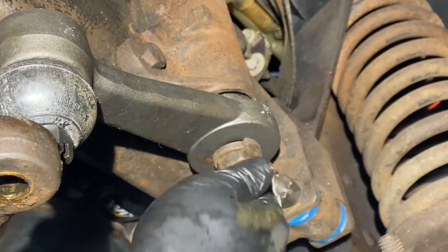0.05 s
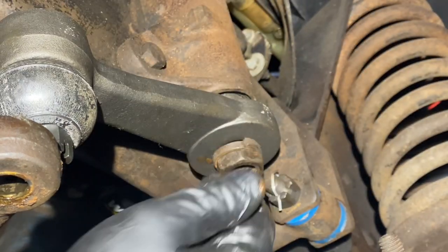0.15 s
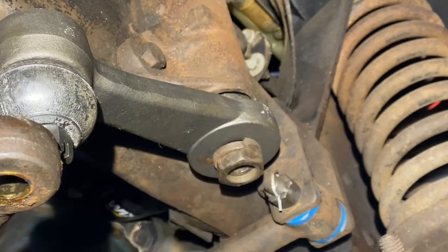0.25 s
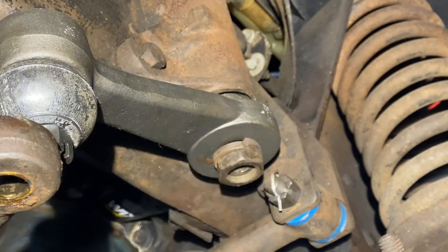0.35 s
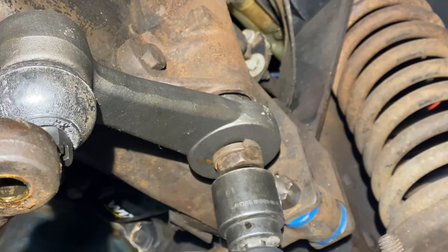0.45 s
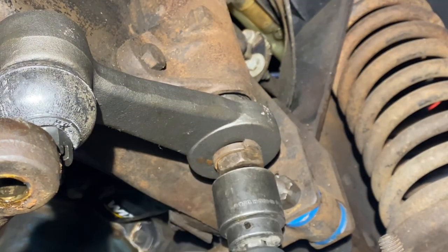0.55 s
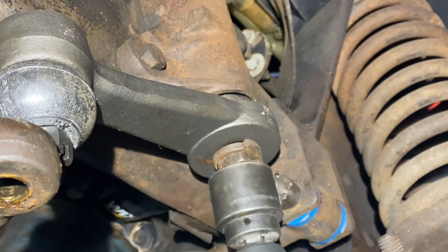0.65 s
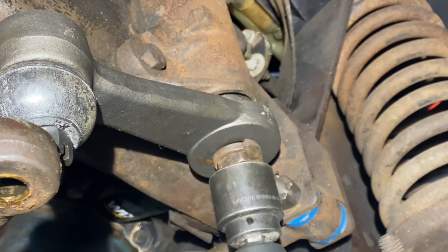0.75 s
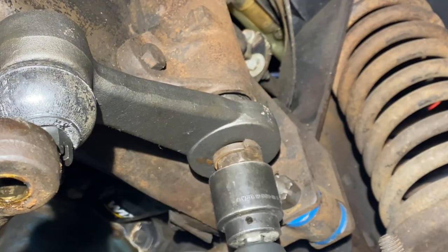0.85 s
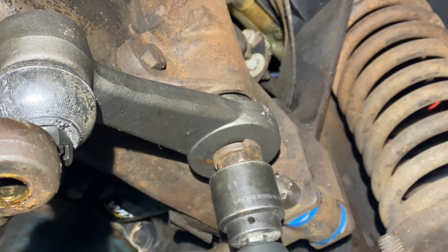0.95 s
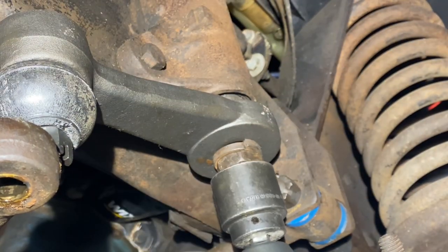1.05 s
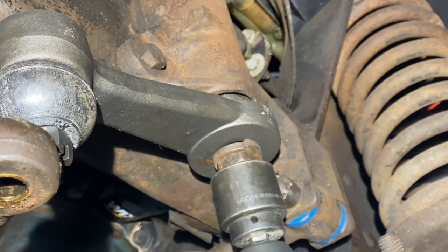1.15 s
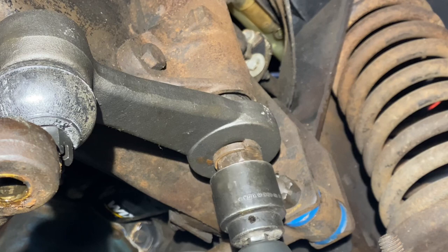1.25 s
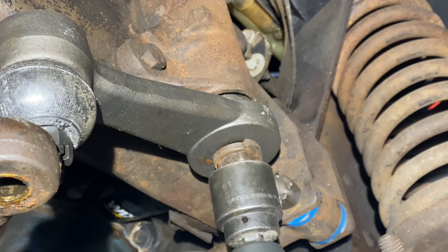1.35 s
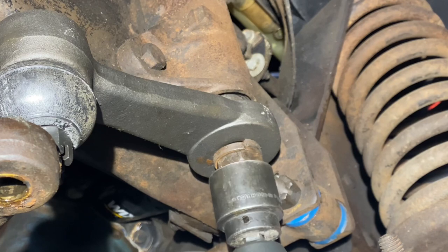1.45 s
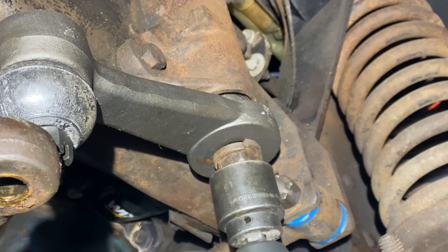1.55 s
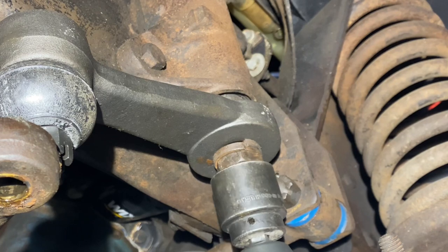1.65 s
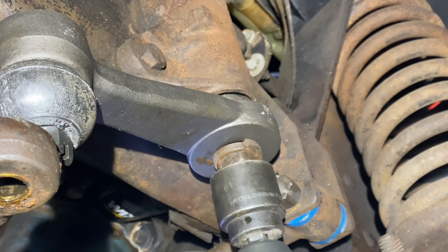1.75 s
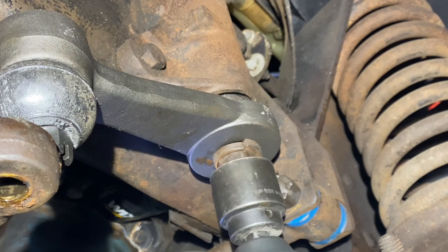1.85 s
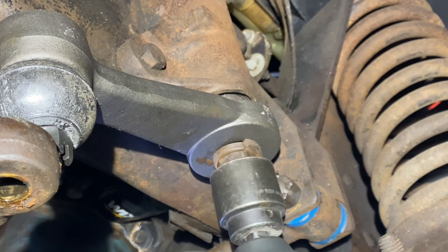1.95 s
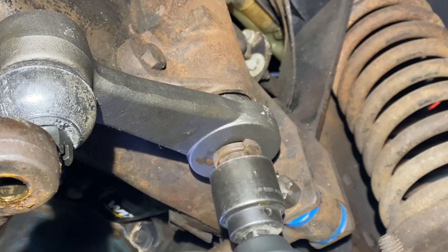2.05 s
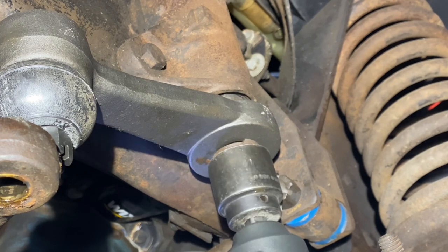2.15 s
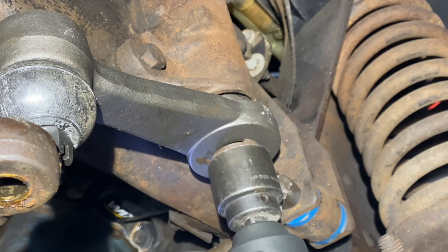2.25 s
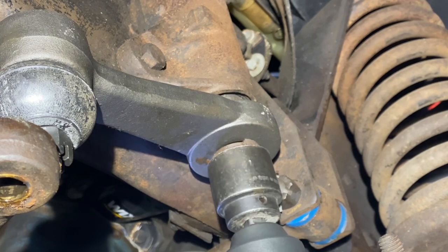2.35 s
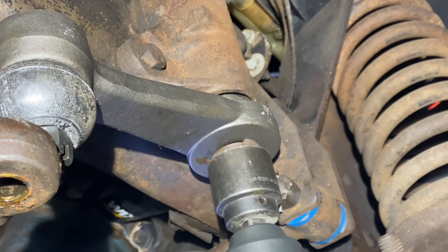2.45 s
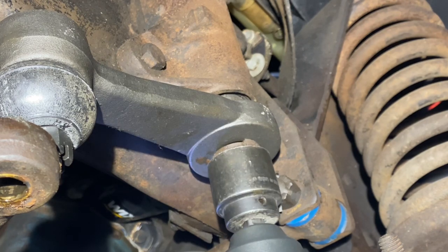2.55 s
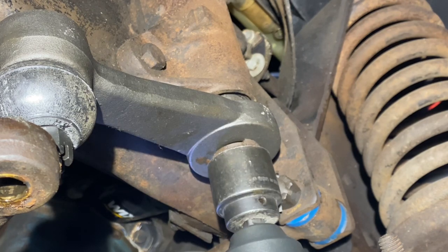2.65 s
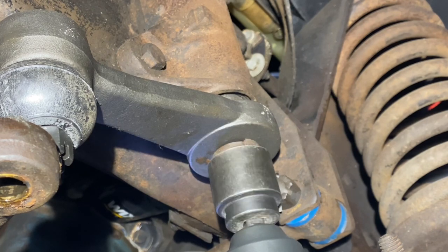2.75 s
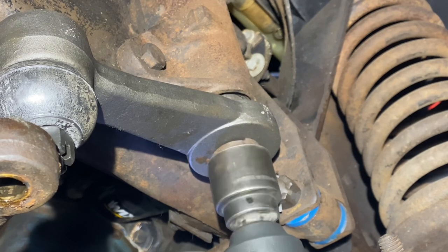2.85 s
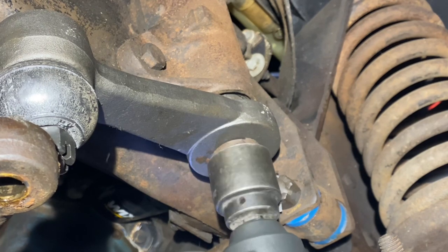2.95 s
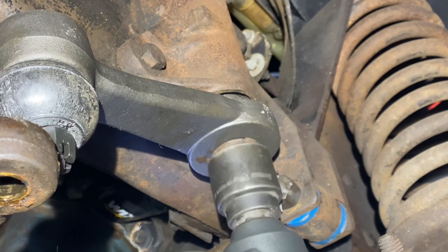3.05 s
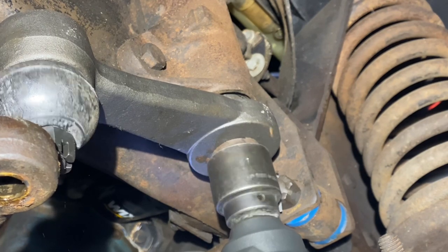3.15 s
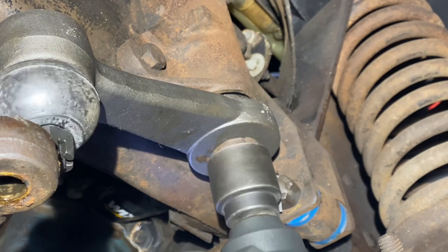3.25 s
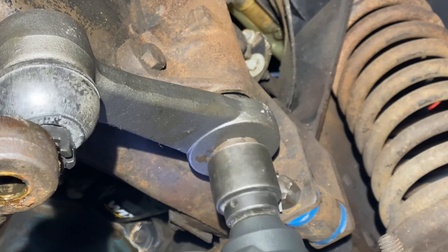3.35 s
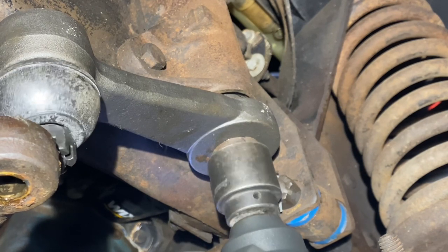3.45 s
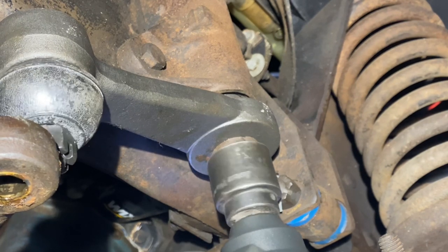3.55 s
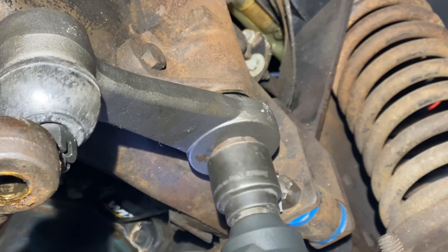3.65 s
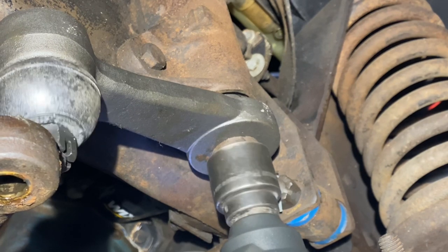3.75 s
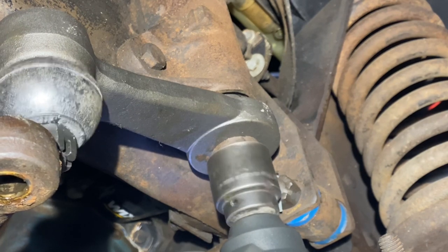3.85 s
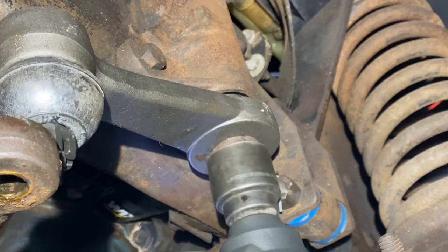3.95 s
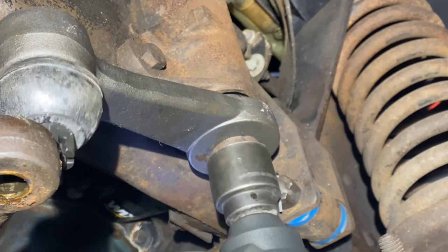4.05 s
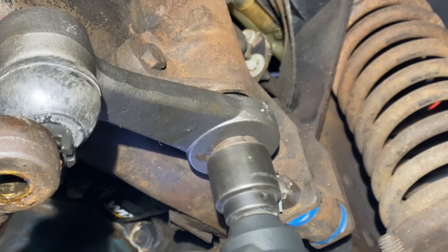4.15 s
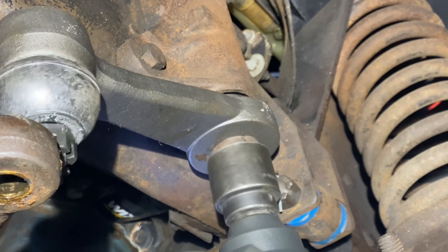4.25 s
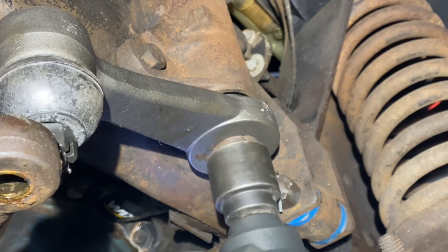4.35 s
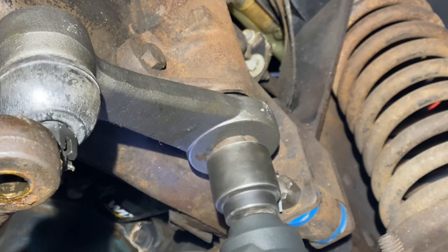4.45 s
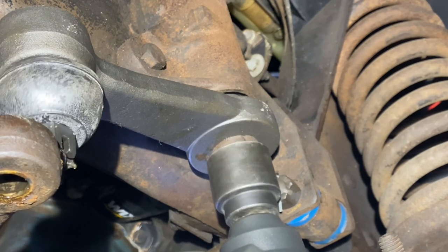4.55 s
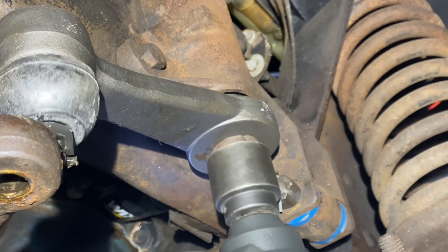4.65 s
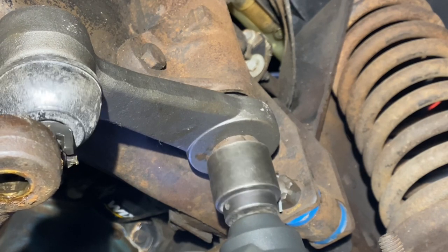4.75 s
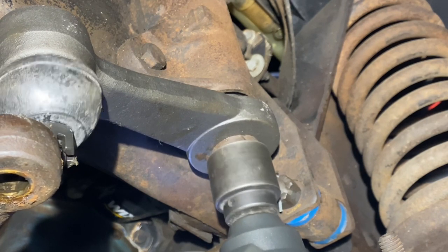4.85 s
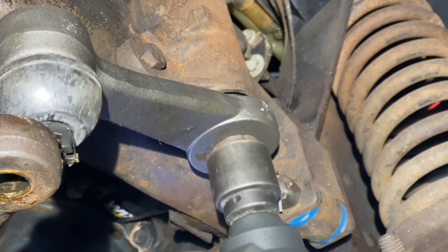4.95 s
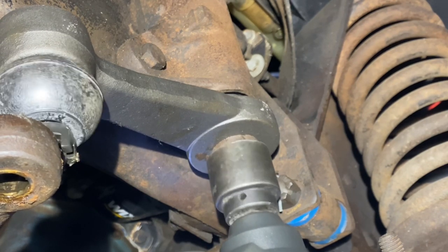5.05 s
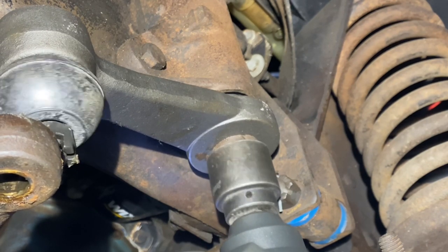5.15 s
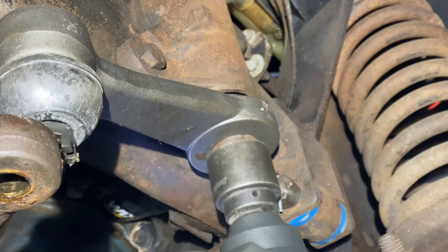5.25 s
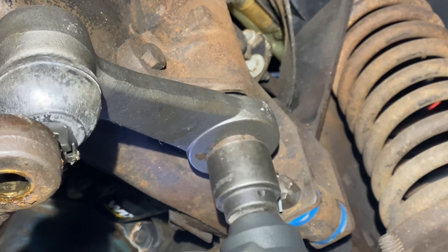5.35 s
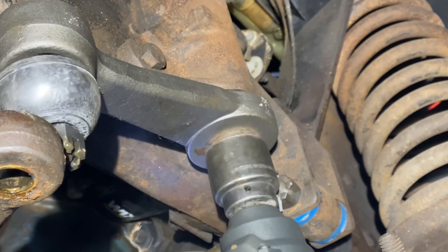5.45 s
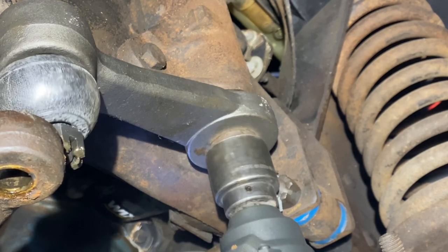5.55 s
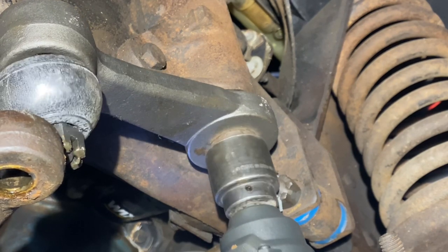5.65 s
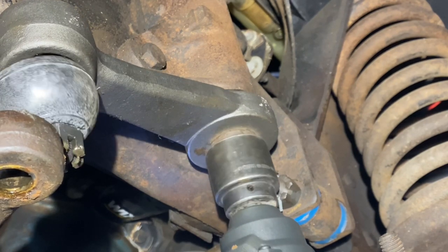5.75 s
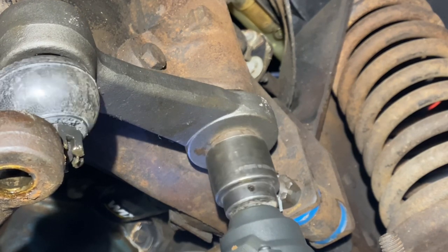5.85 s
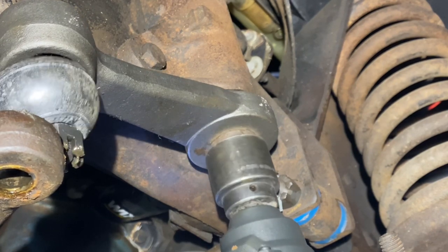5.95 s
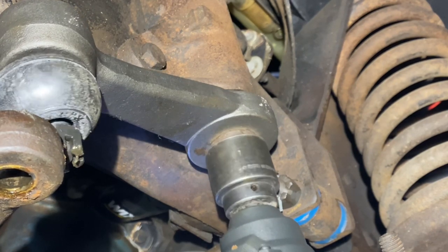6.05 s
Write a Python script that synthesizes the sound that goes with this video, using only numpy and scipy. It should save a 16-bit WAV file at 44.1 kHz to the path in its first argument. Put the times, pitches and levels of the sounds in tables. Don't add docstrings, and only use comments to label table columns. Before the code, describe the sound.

Faint hum and glove rustle, scattered metallic clanks, then a short motor whirr bursts into loud, steady impact-wrench hammering on a vehicle's steel.

```python
import sys
import numpy as np
from scipy import signal
from scipy.fft import rfft, irfft, next_fast_len
from scipy.io import wavfile
from scipy.ndimage import map_coordinates

SR = 44100
rng = np.random.default_rng(int(sys.argv[2]) if len(sys.argv) > 2 else 0)


def elevation(decibels):
    levels = np.asarray(decibels, float)
    return 10 ** (levels / 20)


def log_audio(samples):
    frames = np.atleast_2d(samples).T
    limited = np.clip(frames, -1, 1)
    pcm = np.round(limited * 32767).astype(np.int16)
    wavfile.write(sys.argv[1], SR, pcm)


N = 269846
TIME = np.arange(N) / SR


def unit(x):
    return x / np.sqrt(np.mean(x ** 2) + 1e-20)


def along(points, hz):
    f, v = np.transpose(points)
    return np.interp(np.log(hz + 1), np.log(f + 1), v)


def curves(rows):
    s, *cols = np.transpose(rows)
    return [np.interp(TIME, s, c, left=-200, right=-200) for c in cols]


def humps(strokes, rise, fall):
    return np.max([db - np.maximum(rise * (s - TIME), fall * (TIME - s)) for s, db in strokes], axis=0)


def wobble(rate):
    knots = rng.standard_normal(int(N * rate / SR) + 4)
    return map_coordinates(knots, [np.arange(N) * rate / SR])


def filtered(x, response):
    m = next_fast_len(N + 8192)
    return irfft(rfft(x, m) * response(np.fft.rfftfreq(m, 1 / SR)), m)[..., :N]


def resonant(modes):
    def response(f):
        return sum((-1) ** k * elevation(db) * 1j * f * width / (hz * hz - f * f + 1j * f * width)
                   for k, (hz, width, db) in enumerate(modes))
    return response


def noise(spectrum=None):
    white = rng.standard_normal((2, N))
    if spectrum is None:
        return white
    return unit(filtered(white, lambda hz: elevation(along(spectrum, hz))))


def spikes(times, gains):
    return np.bincount(np.round(np.asarray(times) * SR).astype(int), gains, N)[:N]


def dying(train, t60, attack):
    t = np.arange(int(2 * t60 * SR)) / SR
    return np.abs(signal.fftconvolve(train, elevation(-60 * t / t60) * (1 - np.exp(-t / attack)))[:N])


# (time [s], depth [dB], fade out [s], fade in [s])
CHANGES = [
    (.422, -18, 0.024, 0.011),
    (5.455, -17, 0.023, 0.032),
]
# (frequency [Hz], level [dB per Hz])
AIR_SPECTRUM = [(70, 4), (140, -4.5), (250, -7.5), (450, -8.5), (800, -15.5), (1400, -11.5), (2100, -16.5),
                (2800, -18), (4200, -19), (6500, -23.5), (8500, -28), (10500, -33), (13200, -39),
                (15500, -40)]
# (frequency [Hz], width [Hz], level [dB])
FAN_TONES = [(120, 4.9, 4), (1400, 7, 2.5), (1790, 66, -13), (4390, 200, -20)]


def garage():
    hum = unit(noise(AIR_SPECTRUM) + .5 * unit(filtered(noise(), resonant(FAN_TONES))))
    hiss = noise([(60, -9.5), (300, -18.0), (1200, -36), (3000, -40.0), (15000, -49.0)])
    return (TIME < CHANGES[0][0]) * elevation(-54 + 1.4 * wobble(14.0)) * hum + elevation(-65.5) * hiss


# (time [s], level [dB])
GLOVE_STROKES = [
    (.062, -52),
    (.104, -47),
    (.4, -67),
]


def glove():
    rustle_db = np.maximum(-70, humps(GLOVE_STROKES, rise=600, fall=600))
    rustle = noise([(3000, -16), (6000, -16), (10500, -8), (15500, -6.0)])
    return (TIME < CHANGES[0][0]) * elevation(rustle_db + 0.5 + 1.2 * wobble(60)) * rustle


# (time [s], rumble [dB], chassis boom above it [dB])
TOOL_SHOVES = [(.47, -37.5, -7), (0.729, -43, 5), (.86, -45.5, -4.5), (1.11, -36, -19), (1.26, -43.5, -14),
               (1.35, -34, -4), (1.56, -42, -10), (1.69, -43, -9), (1.849, -37.5, 5.5), (1.94, -35.5, -11),
               (2.155, -29.5, 1), (2.33, -37.5, -7), (2.42, -40, -10.5), (2.57, -43.5, -18),
               (2.65, -48, -16.5)]
# (frequency [Hz], level [dB per Hz])
RUMBLE_SPECTRUM = [(25, -25.5), (40, -12.5), (65, 1), (120, -9.5), (200, -11.5), (400, -89)]
# (frequency [Hz], level [dB per Hz])
BOOM_SPECTRUM = [(60, -45.5), (130, 2.5), (230, 11.5), (350, -2.5), (500, -8.5), (1000, -16), (2000, -54)]


def shoves():
    s, shove_db, above_db = np.transpose(TOOL_SHOVES)
    rumble_db = humps(zip(s, shove_db), rise=163, fall=56)
    boom_db = humps(zip(s, shove_db + above_db), rise=300, fall=111)
    rumble = elevation(rumble_db - 0.5) * noise(RUMBLE_SPECTRUM)
    return rumble + elevation(boom_db + 0.5 + 0.43 * wobble(29.78)) * noise(BOOM_SPECTRUM)


# (time [s], level [dB])
RUST_SCRAPES = [(.475, -60.5), (.7, -53.5), (.86, -67), (1.099, -47), (1.33, -57.5), (1.68, -65.5),
                (1.765, -58), (1.786, -45.5), (1.8, -45.5), (1.82, -38), (1.865, -41), (1.885, -44.5),
                (1.92, -52.5), (2.07, -55), (2.15, -42.5)]
# (time [s], level [dB])
MOTOR_CREEPS = [
    (2.648, -65),
    (2.67, -64),
    (2.695, -69),
]
# (frequency [Hz], level [dB per Hz])
SCRAPE_SPECTRUM = [(300, -36.5), (900, 6.5), (2000, -3.5), (4000, -10), (7500, -21), (15500, -38)]
# (time [s], level [dB])
GRIT_STROKES = [
    (.475, -68),
    (.67, -70),
    (.705, -62),
    (.89, -80),
    (1.87, -70),
    (2.08, -73),
    (2.105, -59),
    (2.125, -56),
    (2.15, -65),
    (2.67, -80.5),
]


def scraping():
    scrape_db = np.maximum(humps(RUST_SCRAPES, rise=236, fall=160), humps(MOTOR_CREEPS, rise=1500, fall=100))
    grit_db = humps(GRIT_STROKES, rise=820, fall=390) + 4.5 * wobble(300)
    grit = elevation(grit_db) * noise([(7000, -34), (10600, 2.0), (12400, -15), (15500, -10.5)])
    return grit + elevation(scrape_db - 3.0 + 3.1 * wobble(230)) * noise(SCRAPE_SPECTRUM)


# (time [s], clank peak [dB], thud, knock and tick above the clank [dB])
CONTACTS = [(0.4719, -55, 21.5, 6, -6), (0.666, -45, 14, 2, -8), (0.6917, -31.5, -24, 5.5, -26),
            (0.702, -29, -7, 6, -9), (1.067, -17.5, 9, 7, -4.5), (1.1533, -27.5, 11, 9.5, -10.5),
            (1.2346, -76, 23, -5, -19), (1.3385, -25.5, 8.5, 0, -5.5), (1.388, -21.5, -32, 0.5, -9.5),
            (1.5605, -60, 9, -4, 8), (1.705, -35, 18.5, 14.5, -6), (1.791, -16.5, -40, -9.5, -11),
            (1.842, -39, 19.5, 10, -8), (1.8516, -18.5, -25, -10, -15.5), (2.014, -47.5, -7, -16, -19),
            (2.061, -44.5, -9, 3, -31), (1.9041, -55, -20, -12, -10), (2.1067, -49, 19.5, -8, 2),
            (2.1349, -35.5, 8.5, 8.5, -1), (2.1447, -42.5, 19.5, 5, -9), (2.185, -55, -21, -8, 10)]
# (low edge [Hz], high edge [Hz], blow t60 [s], garage t60 [s], garage level [dB])
CONTACT_PARTS = [
    (1425, 5200, 0.024, 0.19, -15.5),
    (241, 425, 0.025, 0.51, -16.5),
    (520, 1770, 0.051, 0.33, -15.5),
    (5900, 13400, 0.038, 0.21, -20.5),
]


def knocks():
    s, clank_db, *above = np.transpose(CONTACTS)
    out = np.zeros((2, N))
    for (lo_hz, hi_hz, t60, room_t60, room_db), extra_db in zip(CONTACT_PARTS, [0, *above]):
        train = spikes(s, elevation(clank_db + extra_db - 6.5))
        direct = dying(train, t60, attack=0.00059)
        room = elevation(room_db + 1.8 * wobble(90)) * dying(train, room_t60, attack=0.0038)
        band = signal.butter(3, [lo_hz, hi_hz], "bandpass", fs=SR, output="sos")
        out += signal.sosfilt(band, (direct + room) * noise()) * np.sqrt(SR / 2 / (hi_hz - lo_hz))
    return out


# (frequency [Hz], level [dB], t60 [s])
SOCKET_MODES = [(337.4, 3, 0.16), (370, -13, 0.59), (692, -6, 0.36), (1100, 2.5, 0.13),
                (1600, -19.5, 0.081), (2100, -12, 0.15), (2920, -11, 0.16)]
# (time [s], frequency [Hz], level [dB], t60 [s])
LOOSE_PINGS = [(.704, 3200, -46, 0.25), (1.791, 1200, -33.5, 0.074), (0.701, 1300, -28.5, 0.088),
               (0.712, 743, -40, 0.3), (1.045, 3660, -72, .06), (1.1, 4820, -42.5, 0.032),
               (1.388, 1880, -20.5, 0.04), (1.388, 2260, -20, 0.04), (2.015, 3900, -53, 0.065),
               (1.788, 3900, -34, 0.036), (1.849, 3280, -29, 0.034), (1.071, 1175, -31, 0.35),
               (1.155, 1168, -37, 0.52), (1.157, 310, -40.5, 0.61), (1.071, 689, -39, 0.44),
               (1.069, 2200, -30, 0.08), (1.792, 6300, -37, 0.02), (2.106, 10700, -46, 0.04),
               (1.792, 2050, -40, .06), (.675, 244, -27.5, 0.16), (.704, 2800, -40, 0.14),
               (1.069, 1491, -28, .08), (1.155, 1870, -27.5, 0.041), (1.853, 1300, -37, .12),
               (1.853, 2600, -40, .1), (.712, 1610, -46, 0.23), (2.809, 1450, -13, 0.03),
               (2.81, 2700, -14.5, .03), (2.767, 2500, -16, 0.052), (1.155, 1300, -28.5, 0.073),
               (1.154, 340, -27.5, 0.05), (1.1, 2035, -47, 0.37), (1.707, 1152, -42, 0.63),
               (1.342, 259, -17, 0.0805), (2.147, 226, -16.5, 0.065), (1.069, 1120, -14, 0.04),
               (1.068, 300, -22, 0.06), (2.137, 3200, -22.5, 0.014)]


def rings():
    s, clank_db, thud_db, knock_db, _ = np.transpose(CONTACTS)
    notes = []
    for at, thud, ring in zip(s, clank_db + thud_db, clank_db + knock_db - 2):
        for hz, db, t60 in SOCKET_MODES:
            notes.append((at, hz, db + (thud if hz < 500 else ring) - 15, t60, .6))
    notes += [(*ping, .5) for ping in LOOSE_PINGS]
    out, t = np.zeros((2, N + SR)), np.arange(SR // 2) / SR
    rattle = 2.3 * wobble(70)
    for at, hz, db, t60, play in notes:
        start = round(at * SR)
        size, turn = rng.standard_normal((2, 2, 1))
        flutter_db = play * (0.81 * size + 1.5 * rattle[start:][:len(t)])
        level = elevation(db - 60 * t / t60 + flutter_db) * (1 - np.exp(-t / 0.00039))
        out[:, start:][:, :len(t)] += level * [[1], [0.97 * play]] * np.sin(2 * np.pi * (hz * t + turn))
    return out[:, :N]


def shake(rumble_db, grip_db):
    level_db = rumble_db - 5.0 + 0.27 * grip_db + 2.2 * wobble(25)
    return elevation(level_db) * noise([(25, -11), (60, -5.5), (150, -5.5), (260, -4.0), (450, -12.5),
                                  (1000, -10.5), (2000, -43.0)])


# (frequency [Hz], width [Hz], level [dB])
SHELL_MODES = [(1425, 190, -5), (2650, 1000, -5.5), (3760, 900, -9)]


def small(hz):
    return hz ** 4 / (hz ** 4 + 1300 ** 4)


def shell(hz):
    return small(hz) * (1 + resonant(SHELL_MODES)(hz) ** 2)


# (time [s], level [dB])
FREE_SPIN = [
    (2.732, -3),
    (2.748, -6.5),
    (2.768, 1),
    (2.785, -1.5),
]
# (frequency [Hz], level [dB per Hz])
MOTOR_SPECTRUM = [(250, 4.5), (450, 15), (800, 11), (1400, 12.5), (2100, 5), (2800, 10.5), (4200, 3),
                  (6500, 2.5), (8500, -18), (10500, -13), (13200, -20), (15500, -12)]


def motor(blow_db, grip_db, load_db):
    free_db = humps(FREE_SPIN, rise=1700, fall=280)
    motor_db = np.maximum(blow_db + 5.5 + 0.12 * grip_db + load_db, free_db - 13)
    gears = filtered(noise(MOTOR_SPECTRUM), lambda hz: 0.39 + shell(hz))
    whine = unit(filtered(noise(), resonant([(3840, 480, 0)])))
    return elevation(motor_db - 7.5 + 0.16 * wobble(120)) * gears + elevation(free_db - 23 + 3.0 * wobble(90)) * whine


# (time [s], peak [dB], brightness [dB])
SLACK = [
    (2.7254, -4, -5.5),
    (2.7428, -16.5, 0.5),
    (2.7568, -16, -7.5),
    (2.768, -13, -9),
    (2.782, -17.5, -9),
    (2.792, -10.5, 0),
    (2.803, -12.5, 0.5),
    (2.809, -11.5, -3.5),
]
# (time [s], delay [s], level [dB])
REBOUNDS = [
    (2.82, .0105, -2),
    (2.95, .0098, -2.5),
    (3.0, .0075, -6),
    (3.4, .0075, -7),
    (3.8, .004, -10),
    (5.45, .0038, -8.5),
    (5.48, .0033, -6.5),
    (6.2, .0033, -6.5),
]


def strikes(s, chance):
    slack_s, slack_db, _ = np.transpose(SLACK)
    when, delay, back_db = np.transpose(REBOUNDS)
    back = np.minimum(s + np.interp(s, when, delay) + .0007 * chance[:, 2], (N - 1) / SR)
    hits = spikes(slack_s, elevation(slack_db + 12)) + spikes(s, elevation(.6 * chance[:, 1]))
    return hits + spikes(back, elevation(np.interp(s, when, back_db) + 2.2 * chance[:, 3]))


def contact(hits, clang_db):
    t = np.arange(SR // 25) / SR
    tick_shape = elevation(-60 * t / 0.017) * rng.standard_normal((2, len(t)))
    tick = signal.fftconvolve(hits[None], tick_shape, axes=1)[:, :N]
    snap = dying(hits, 0.0065, attack=0.00045) * noise()
    crack = dying(hits, 0.02, attack=0.00097) * elevation(1.25 * wobble(500)) * noise()
    clang = dying(hits, 0.12, attack=0.012) * elevation(2.46 * wobble(250)) * noise()
    dull = filtered(clang, lambda hz: 1 / (1 + (hz / 7000) ** 2))
    return elevation(0.38) * tick + elevation(-4.0) * snap + crack + elevation(clang_db - 5.0) * dull


# (frequency [Hz], level [dB per Hz])
TURNING_SPECTRUM = [(250, -3), (450, 10), (800, -6.5), (1400, -2.5), (2100, -9.5), (2800, -6), (4200, -7),
                    (6500, -6.5), (8500, -12.5), (10500, -9), (13200, -7), (15500, -10.5)]
# (frequency [Hz], level [dB per Hz])
SEATED_SPECTRUM = [(250, 3), (450, 9), (800, -0.5), (1400, -10.5), (2100, -11), (2800, -10.5), (4200, -3),
                   (6500, -3), (8500, -9), (10500, -10.5), (13200, -5.5), (15500, -8)]
# (frequency [Hz], width [Hz], level [dB])
ANVIL_MODES = [(2790, 320, -1), (4010, 100, -12), (10650, 600, 0.5)]


def through_tool(burst, seated):
    turning = filtered(burst * ~seated, lambda hz: shell(hz) * elevation(along(TURNING_SPECTRUM, hz) + 13.0))
    tight = filtered(burst * seated, lambda hz: small(hz) * elevation(along(SEATED_SPECTRUM, hz) + 10.5)
                     * (1 + 2.0 * resonant(ANVIL_MODES)(hz)))
    return turning + tight


# (time [s], left level [dB], right level [dB], lowest frequency [Hz])
PORT_JOLTS = [(2.774, -34, -25, 70), (2.827, -19.5, -11, 40.6), (2.907, -19.5, -20, 49.7),
              (3.002, -23, -19, 80), (3.024, -40, -15.5, 120), (3.048, -24, -21.5, 50),
              (3.070, -16, -35, 150), (3.16, -15, -50, 100), (3.18, -13, -26, 40), (3.2, -20, -19, 150),
              (3.225, -28, -22, 60), (3.266, -25, -35, 80), (4.106, -22.5, -31, 50), (4.365, -24, -31, 50),
              (4.407, -12, -39, 200), (4.59, -33, -32, 60), (5.053, -22, -33, 60), (5.095, -26, -43, 60),
              (5.174, -27, -27, 50), (5.503, -13.5, -22, 250), (5.544, -20, -30, 120),
              (5.666, -18, -38, 250), (5.787, -20, -21, 200), (5.827, -9.5, -12, 280),
              (5.869, -22, -46, 200), (5.930, -23.5, -48, 60), (5.95, -44, -16, 250),
              (5.972, -27, -43, 100), (6.029, -22, -19, 200), (6.072, -12, -18.5, 250),
              (6.093, -24, -40, 149)]


def jolts():
    out, t = np.zeros((2, N + SR)), np.arange(SR // 5) / SR
    for s, left_db, right_db, low_hz in PORT_JOLTS:
        creep = np.exp(-2 * np.pi * 2.36 * low_hz * t) * (1 - 2 * np.pi * 0.19 * low_hz * t)
        kick = creep * (1 - np.exp(-t / 0.00043))
        out[0, round(s * SR):][:len(t)] += elevation(left_db + 12) * kick
        out[1, round((s + .0019) * SR):][:len(t)] += elevation(right_db + 12) * kick
    return out[:, :N]


# (time [s], blows struck so far [count])
HAMMER_PACE = [(2.8266, 0), (2.8538, 1), (2.9306, 4), (2.9787, 6), (3.0469, 9), (3.1805, 15), (3.309, 21),
               (3.4351, 27), (3.5796, 34), (3.7012, 40), (3.9042, 50), (4.3067, 70), (4.5078, 80),
               (4.7107, 90), (5.4378, 126), (5.4818, 128), (5.6844, 138), (6.0928, 158)]


def blow_times():
    at, count = np.transpose(HAMMER_PACE)
    beat = np.interp(np.arange(count[-1] + 2), [*count, count[-1] + 1], [*at, at[-1] + .0204])
    return beat + .0008


def lift(s, chance):
    train = spikes(s - 0.0059, elevation(-5 + 2.65 * chance[:, 3]))
    return 2.8 * filtered(dying(train, 0.013, attack=0.0005) * noise(), resonant([(2250, 1030, 0)]))


# (time [s], body [dB], brightness [dB])
BLOW_ACCENTS = [(2.854, 3, 0.5), (2.879, -1, 1), (2.905, 1.5, -2.5), (2.931, -1, 0), (2.979, 1, -1.5),
                (3.001, 0, 2), (3.024, -1, 0.5), (3.047, -10, -1), (3.069, -5, 0.5), (3.114, 1, -2.5),
                (3.136, 1, -3), (3.18, 7.5, 0), (3.202, 1, 0), (3.245, -6, -1), (3.288, 0, -0.5),
                (3.309, -9, -3), (3.414, 5, -3), (3.435, 5, 2.5), (3.518, -1, -0.5), (3.538, -10, -2.5),
                (3.6, -6, -1), (3.661, -3, 0), (3.701, -4, -2), (3.721, 0.0, -6), (3.803, 2.5, 1),
                (3.823, 4.5, -0.5), (3.884, 2, 1), (3.944, -9, -2), (4.085, 1, 1.5), (4.146, 0, 1),
                (4.166, -8, 2), (4.206, -13, -2), (4.246, 3.5, 2), (4.266, -2, -2.5), (4.307, -2, -1.5),
                (4.327, 1.5, -1.5), (4.347, 3.5, 0.5), (4.387, 5, 1), (4.508, 4.5, -0.5), (4.528, 3.5, 0.5),
                (4.548, 0, -3), (4.65, 1.5, -2.0), (5.034, 1, -1), (5.175, -3, 1.5), (5.236, -13, 1),
                (5.276, 0, 0.5), (5.357, -7, 1.5), (5.502, -1, 2.5), (5.522, -3, 1), (5.583, 0.0, 0.5),
                (5.603, 0.5, -2), (5.644, -3, -0.5), (5.725, -5, -1.5), (5.766, 4.5, 0), (5.807, 2, -2),
                (5.848, 2.5, -0.5), (5.929, 1, 0), (5.991, -1.5, -2), (6.011, 3, -0.5), (6.093, 3, 1.0)]


def accents(s, chance):
    accent = 1.17 * chance[:, 2] * np.array([[1], [-1]])
    nearest = [np.abs(s - row[0]).argmin() for row in BLOW_ACCENTS]
    accent[:, nearest] = np.transpose(BLOW_ACCENTS)[1:]
    return accent


# (time [s], level [dB])
BARE_SNAPS = [
    (3.0701, -6),
    (3.2451, -9),
    (3.457, -5),
    (4.408, -12),
    (4.57, -6),
    (5.358, -16),
    (5.828, -16),
    (5.951, -6.5),
    (6.032, -0.5),
]


def snaps(s, chance):
    at, db = np.transpose(BARE_SNAPS)
    little = spikes(s + 0.0012 * np.abs(chance[:, 4]), elevation(5 * chance[:, 5]))
    return (little + spikes(at, elevation(db + 26))) * [[1], [.3]]


# (frequency [Hz], level turning [dB], level seated [dB], t60 [s])
CHIME_MODES = [(1440, -19, -10.5, 0.027), (2771, -7.5, -8.5, 0.032), (4250, -14, -15, 0.025),
               (5530, -5, -10, 0.022), (5780, -13, 3.5, .028), (6030, -11.5, -6, 0.023),
               (7240, -12.5, -12, 0.026), (10540, -12, -4.5, 0.025)]


def chimes(times, levels_db, seated):
    t = np.arange(SR // 25) / SR
    where = (np.round(times * SR).astype(int)[:, None] + np.arange(len(t))).ravel()
    out = 0
    for hz, turning_db, seated_db, t60 in CHIME_MODES:
        size, pitch, turn = rng.standard_normal((3, len(times), 1))
        level_db = (levels_db + np.where(seated, seated_db, turning_db))[:, None] + 4.5 * size
        tone = np.sin(2 * np.pi * (hz * (1 + .022 * pitch) * t + 0.11 * turn))
        out = out + elevation(level_db - 60 * t / t60) * tone
    out = out * (1 - np.exp(-t / 0.00034))
    return np.bincount(where, out.ravel(), N + SR)[:N] * [[1], [.08]]


# (frequency [Hz], width [Hz], level [dB])
ARM_MODES = [(573.5, 33.4, -1), (825.4, 29, 2), (1097.5, 28, -1.5), (1295, 7.4, -4), (1408, 55, 1),
             (2180, 80, -5), (2980, 180, -8), (3830, 200, -10)]
# (frequency [Hz], width [Hz], level [dB])
SWAY_MODES = [(388, 70, 2), (610, 69, -0.5), (847, 46, 4), (1270, 30, -9)]
# (frequency [Hz], width [Hz], level [dB])
FRAME_MODES = [(137.7, 23, 0.5), (247, 16.4, 2), (349.5, 25, -7)]


def vehicle(push, arm_db, rumble_db):
    arm = filtered(push * elevation(arm_db + 42.0), lambda hz: [resonant(ARM_MODES)(hz), 0.36 * resonant(SWAY_MODES)(hz)])
    return arm + filtered(push * elevation(rumble_db + 46.5), resonant(FRAME_MODES)) * [[1], [0.3]]


# (time [s], blow level [dB], grip of the socket on the arm [dB])
WRENCH_LEVELS = [(2.71, -71, 6), (2.73, -30, 2.5), (2.77, -28, 7), (2.825, -26.5, 2.5), (2.9, -28, -5),
                 (3.23, -30, 5), (3.36, -31, 2), (3.59, -33, -20), (3.87, -32, -1.5), (4.27, -33.5, 0.5),
                 (4.66, -32, 4.5), (5.42, -32, 3), (5.482, -33.5, -4), (5.6, -33, 2.5), (5.96, -33, 3),
                 (6.12, -32.5, -12)]
# (time [s], body [dB], motor [dB])
BLOW_BITE = [
    (2.83, -2.5, -1),
    (3.0, 1.5, 0.5),
    (3.5, -4.5, 2.5),
    (3.9, 2, 1),
    (5.44, -0.5, -2),
    (5.48, 3.5, -2.5),
    (6.12, 1, -3),
]


def wrench():
    blow_db, grip_db = curves(WRENCH_LEVELS)
    bite_db, load_db = np.maximum(curves(BLOW_BITE), -12)
    seated = TIME > CHANGES[1][0]
    rumble_db = blow_db - 4 + 0.092 * grip_db - 4 * seated
    beat = blow_times()
    chance = rng.standard_normal((len(beat), 6))
    s = beat + .00025 * chance[:, 0]
    accent = accents(s, chance)
    slack_s, _, slack_bright_db = np.transpose(SLACK)
    latest = np.searchsorted([*slack_s[1:], *s], TIME + .001)
    body_db, bright_db = np.hstack([[0 * slack_s, slack_bright_db], accent])[:, latest]
    clang_db = 2.06 * np.hstack([0 * slack_s, chance[:, 4]])[latest]
    burst = contact(strikes(s, chance), clang_db) + snaps(s, chance)
    body = signal.sosfilt(signal.butter(2, 3300, fs=SR, output="sos"), burst)
    body_db = body_db + np.where(bite_db > -12, bite_db, 0)
    burst = elevation(bright_db) * (burst - body) + elevation(body_db) * body + lift(s, chance)
    chime_db = blow_db[np.round(s * SR).astype(int)] + 10.5 + accent.mean(axis=0)
    steel = elevation(blow_db + 9) * through_tool(burst, seated) + chimes(s, chime_db, s > CHANGES[1][0])
    push = spikes(beat, elevation(1.5 * chance[:, 1])) * elevation(-11 * seated)
    struck = steel + vehicle(push, blow_db + grip_db, rumble_db)
    return struck + motor(blow_db, grip_db, load_db) + shake(rumble_db, grip_db)


# (frequency [Hz], level [dB])
HANDLING_TREBLE = [(7500, 0), (9000, -7), (10000, -3), (10700, -1.5), (12000, -5.5), (13200, -7), (14500, -1)]


def less_treble(x):
    return filtered(x, lambda hz: elevation(along(HANDLING_TREBLE, hz)))


# (frequency [Hz], likeness [0 to 1])
PORT_LIKENESS = [(40, .5), (90, 0.88), (170, 0.98), (300, 0.49), (500, 0.03), (2000, 0.12), (4500, 0.092),
                 (5700, 0.39), (7200, 0.067), (9000, 0.52), (11000, 0.62), (13200, 0.9), (14300, .7),
                 (15500, 0.73)]
# (frequency [Hz], phase [rad])
RIGHT_LEAD = [(100, 0), (2000, -1.1), (4400, -1.6), (5500, -3.2), (6050, -3.1), (7600, 1), (8600, 2.6),
              (9300, 3.3), (10400, 5.7), (11300, 6.4), (12400, 8.3), (13200, 9.4), (14100, 10.6),
              (15300, 12.5), (16000, 12.6)]


def ports(pair):
    turn = lambda hz: np.arccos(np.clip(along(PORT_LIKENESS, hz), 0, 1)) / 2
    shared, apart = filtered(pair, lambda hz: [np.cos(turn(hz)), np.sin(turn(hz))])
    half = lambda hz: np.exp(.5j * np.interp(hz, *np.transpose(RIGHT_LEAD)) * [[-1], [1]])
    return filtered(np.array([shared + apart, shared - apart]), half)


def scene():
    handling = (shoves() + scraping()) * (TIME > CHANGES[0][0])
    softened = less_treble(garage() + glove() + handling + knocks() + rings())
    return ports(softened + wrench()) * elevation([[.4], [-.4]]) + jolts()


# (frequency [Hz], level [dB])
MIC_TREBLE = [(8300, 0), (9100, 2), (9600, 0), (10600, 1), (12200, 1), (13100, -5.5), (14000, -0.5)]


def microphone(dry):
    def response(hz):
        chirp = np.exp(-2j * np.pi * (1.76 * np.log(1 + hz / 30) - hz * 0.0007))
        top = .002 * (hz < 17100) + 1 / (1 + (hz / 15900) ** 200)
        return chirp * elevation(along(MIC_TREBLE, hz)) * top * hz ** 3 / (hz ** 3 + 45 ** 3)
    return filtered(dry, response)


def band_limit(x):
    return signal.sosfilt(signal.butter(12, 17150, fs=SR, output="sos"), x)


def record(dry):
    fade_db = 3 + sum(np.interp(TIME, [s - out, s, s + back], [0, db, 0]) for s, db, out, back in CHANGES)
    wet = microphone(dry) * elevation(fade_db)
    held = wet / (1 + np.abs(wet / .9) ** 6) ** (1 / 6)
    return band_limit(held)


dry = scene()
out = record(dry)
log_audio(out)
```